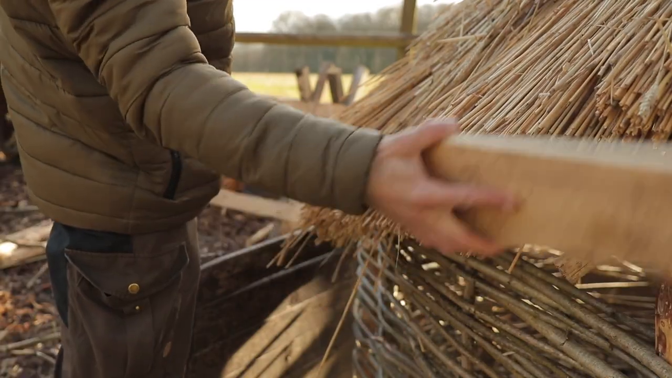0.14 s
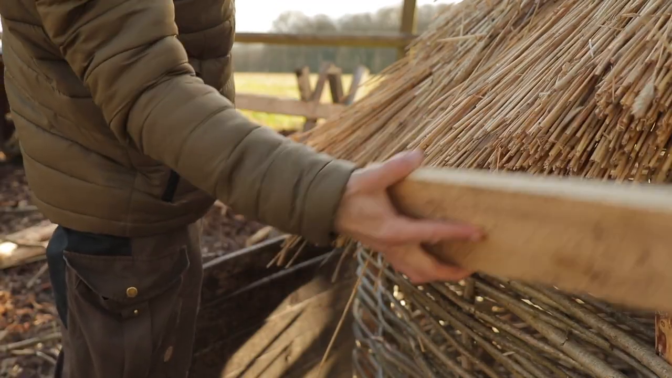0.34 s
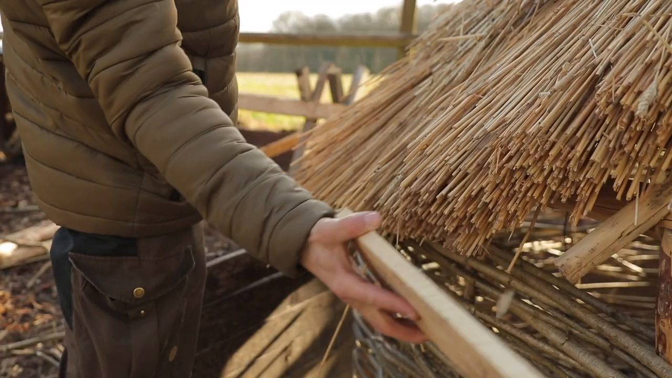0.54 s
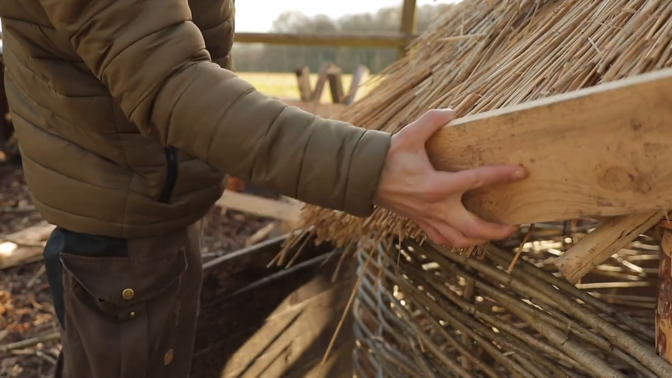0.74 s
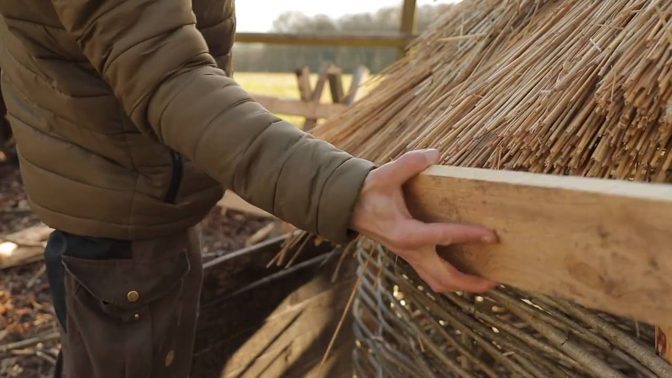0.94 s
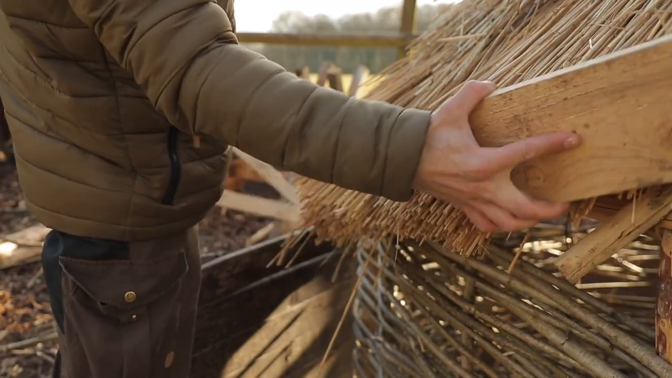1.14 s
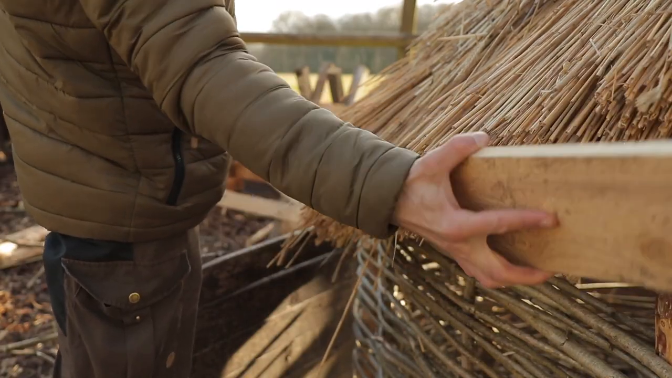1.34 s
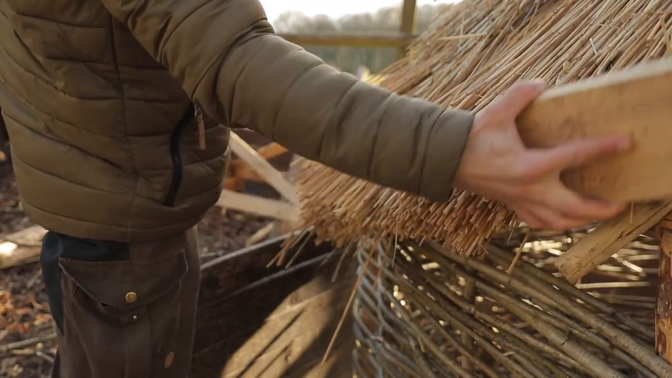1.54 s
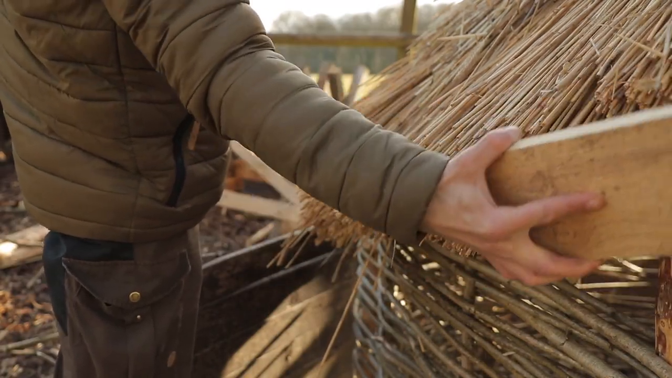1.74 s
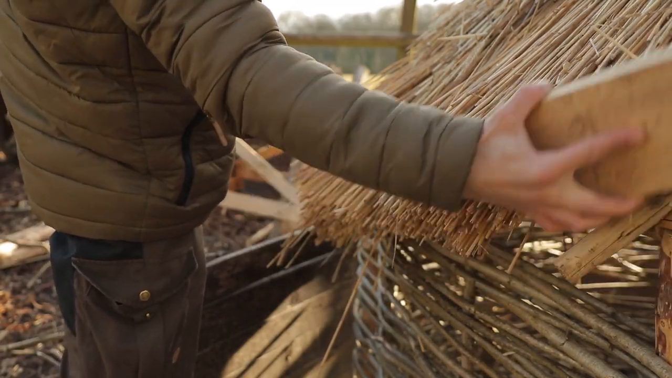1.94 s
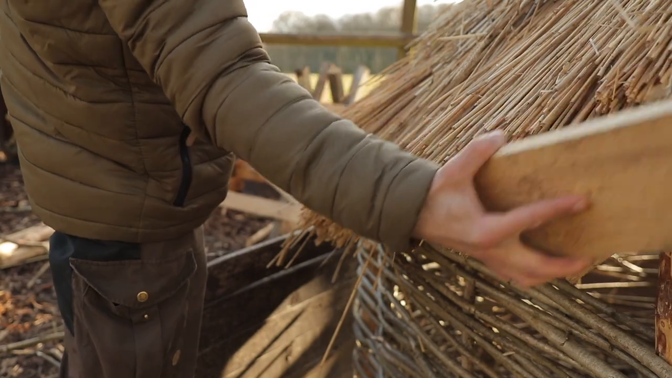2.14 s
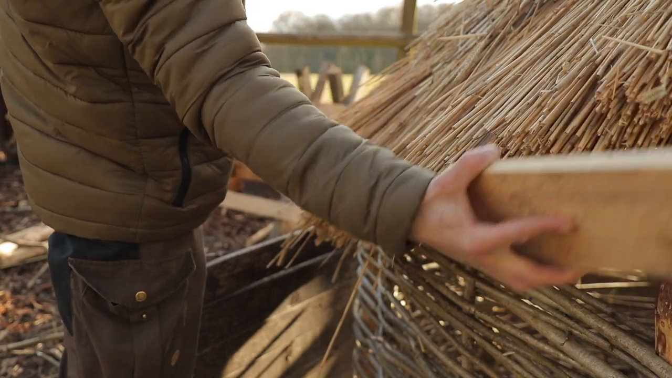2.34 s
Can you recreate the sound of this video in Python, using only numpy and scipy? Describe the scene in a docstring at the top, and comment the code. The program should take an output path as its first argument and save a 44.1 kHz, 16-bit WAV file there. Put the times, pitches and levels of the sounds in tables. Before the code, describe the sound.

Five steady wooden whacks on bundled dry reeds, each with a crunch, short thud and light rustle

```python
"""A low rumble of open air and the tick of a dry reed, then five steady blows of a flat wooden bat
that dresses the reed ends at the eaves of a thatched roof.
Proud reeds clack on the bat first; the whole bundle follows: a crunch of tiny impacts,
a low thud and a short wooden ring built from decaying modes.
Reeds rustle as they settle and tick around the blows, as coloured or resonant bursts of noise grains."""
import sys
import numpy as np
from scipy import signal
from scipy.fft import rfft, irfft
from scipy.io import wavfile
from scipy.ndimage import uniform_filter1d

SR = 44100
rng = np.random.default_rng(int(sys.argv[2]) if len(sys.argv) > 2 else 0)


def master_out(mix):
    """Clip the mix to full scale and print it as 16-bit PCM to the path in sys.argv[1]."""
    frames = np.transpose(np.atleast_2d(mix))
    ceiling = np.clip(frames, -1, 1)
    pcm = np.round(ceiling * 32767).astype(np.int16)
    wavfile.write(sys.argv[1], SR, pcm)


N = 105840
T = np.arange(N) / SR  # time axis [s]

# The five blows: (time of greatest force [s], crunch level [dB], crunch swell [s], thud level [dB],
# thud pitch [Hz], board ring level [dB], lowest bat mode as gripped [Hz], its level [dB],
# its t60 [s], rustle level [dB])
BLOW_TABLE = [(.2298, 1.5, 0.0021, 4, 307, -6.5, 631, 4, 0.032, 1),
              (.7613, 0, 0.0018, 1, 228, 0, 565.5, -8.5, 0.18, -1.5),
              (1.1956, -2.5, 0.0026, -2, 245, -8, 613, -13.5, 0.073, 5.5),
              (1.6143, -4, 0.0031, -0.5, 210.6, -8, 622, -11.5, 0.094, 2.5),
              (2.0122, 2, 0.0022, 2, 219, -11.5, 551.5, -0.5, 0.088, 5)]
# Colour of each blow, by where the bat lands: the band centres ([Hz])
TINT_BANDS_HZ = [600, 850, 1150, 1480, 1900, 2900, 5000]
# One row per blow: (level [dB] at each band centre)
BLOW_TINTS = [(4.5, -1.5, 2, 4, 1, 0, 0.41), (4, 9, -8.5, 1.5, -2.5, 2, 0.82),
              (1, 3, 2, 0.5, 5, -0.79, 0.43), (4.5, 2.5, 3, -9, 4.5, -0.76, 0.92),
              (5.5, -5, -2, 4.5, 5.5, -1, 0.19)]
CRUNCH_DB, THUD_DB, LOW_MODE_DB = -11.5, -13, -24


def blows():
    """Each blow sums the crunch of reed ends, the bundle's thud and the bat's ring."""
    out = np.zeros(N)
    for blow, tint_db in zip(BLOW_TABLE, BLOW_TINTS):
        at, crunch_db, swell, thud_db, thud_hz, ring_db, low_hz, low_db, low_t60, _ = blow
        tint = list(zip(TINT_BANDS_HZ, tint_db))
        out += amp(CRUNCH_DB + crunch_db) * crunch(at, swell, tint)
        out += amp(THUD_DB + thud_db) * thud(at, thud_hz)
        out += amp(LOW_MODE_DB + low_db) * mode(at, low_hz, low_t60)
        out += board_ring(at, ring_db, tint)
    return out


# Spectrum of the reed ends under the bat: (frequency [Hz], relative level [dB])
CRUNCH_SPECTRUM = [(40, -44), (140, -23), (250, -14), (390, -2.5), (490, -8.5), (620, -1), (1000, -1),
                   (1450, -2), (1850, -7.5), (2300, -12), (3000, -2.5), (3800, -12), (5000, -16.5),
                   (7000, -23.5), (10000, -27), (16000, -32.5)]
CONTACTS_PER_S = 9000
SWELL_SHAPE, RELEASE_S = 0.89, 0.0024  # exponent of the rise; time constant of the fall


def crunch(at, swell, tint):
    """Ever more reed ends meet the bat until the force peaks, then they let go."""
    rise = abs((T - at) / swell) ** SWELL_SHAPE
    fall = (T - at) / RELEASE_S
    force = np.exp(-np.where(T < at, rise, fall))
    impacts = contacts(np.tanh(2 * force), CONTACTS_PER_S)
    return colour(even_out(impacts), CRUNCH_SPECTRUM, tint)


THUD_S = .0019  # Gaussian width


def thud(at, hz):
    """The bundle gives way in one low push: a sine under a bell-shaped envelope."""
    t = T - at
    return np.exp(-.5 * (t / THUD_S) ** 2) * np.sin(2 * np.pi * hz * t)


# Modes of the bat above the lowest: (frequency [Hz], level [dB], t60 [s])
BOARD_MODES = [(1005, -9.5, .04), (1248, -4, 0.044), (1484, -2, 0.046), (1917, -7, 0.076),
               (2782, -7, 0.015), (3136, -10, 0.035), (3846, -17.5, .03)]
BOARD_DB = -19.5


def board_ring(at, ring_db, tint):
    """The bat's upper modes ring together, weighted by the tint of the blow."""
    ring = np.zeros(N)
    for hz, db, t60 in BOARD_MODES:
        ring += amp(BOARD_DB + ring_db + db + read(tint, hz)) * mode(at, hz, t60)
    return ring


RING_RISE_S = 0.001225
PRESSED_DB, PRESSED_S = 17, 0.0062  # the bat shakes harder while the reeds bear on it


def mode(at, hz, t60):
    """One mode of the bat: builds up under the reeds, then rings freely."""
    t = T - at
    build = .5 + .5 * np.tanh(t / RING_RISE_S + 2)
    pressed = amp(PRESSED_DB * np.exp(-(t / PRESSED_S) ** 2))
    decay = np.exp(-np.log(1000) * np.maximum(t, 0) / t60)
    tone = np.sin(2 * np.pi * (hz * t + rng.random()))
    return build * pressed * decay * tone


# First touches of proud reeds before a blow: (time [s], level [dB], ring pitch [Hz])
TOUCH_EVENTS = [(0.224, -13.5, 2793), (0.2247, -13.5, 1457), (0.7431, -27, 2780), (0.757, -23, 847),
                (1.1780, -17, 1475), (1.188, -15.5, 1280), (1.596, -29.5, 1430), (1.6054, -12, 1932),
                (2.0054, -22, 1520)]
# Spectrum of a touch's clack: (frequency [Hz], relative level [dB])
TOUCH_SPECTRUM = [(150, -24), (500, -9.5), (900, -1), (1450, -0.5), (2200, 0.5), (3100, -9.5),
                  (4500, -16.5), (8000, -28), (16000, -44.5)]
TOUCH_DB, TOUCH_T60_S = -4.5, 0.034
TOUCH_RING_DB, TOUCH_RING_T60_S = -6, .04


def touches():
    """Proud reeds clack on the bat a moment early: a burst of contacts and a brief sine ring each."""
    clacks = np.zeros(N)
    rings = np.zeros(N)
    for at, db, hz in TOUCH_EVENTS:
        clacks += amp(db) * contacts(dying(at, TOUCH_T60_S), CONTACTS_PER_S)
        rings += amp(db) * dying(at, TOUCH_RING_T60_S) * np.sin(2 * np.pi * hz * (T - at))
    return amp(TOUCH_DB) * colour(clacks, TOUCH_SPECTRUM) + amp(TOUCH_RING_DB) * rings


# Spectrum of reeds settling after a blow: (frequency [Hz], relative level [dB])
RUSTLE_SPECTRUM = [(200, -11), (700, -0.5), (1500, 1.5), (2400, -1), (3600, 0.5), (5500, -8.5),
                   (9000, -10.5), (16000, -16.5)]
RUSTLE_DB, RUSTLE_T60_S, RUSTLE_PER_S = -44.5, 0.27, 6000
STRAGGLERS_DB, STRAGGLERS_T60_S, STRAGGLERS_PER_S = -16, .85, 1100  # level relative to the rustle


def rustle():
    """Shaken reeds rub on each other and come to rest; a few stragglers crackle on."""
    grains = np.zeros(N)
    for at, *_, db in BLOW_TABLE:
        grains += amp(db) * contacts(dying(at, RUSTLE_T60_S), RUSTLE_PER_S)
        stragglers = contacts(dying(at, STRAGGLERS_T60_S), STRAGGLERS_PER_S)
        grains += amp(db + STRAGGLERS_DB) * stragglers
    return amp(RUSTLE_DB) * colour(grains, RUSTLE_SPECTRUM)


# Single reeds ticking: (time [s], level [dB], pitch [Hz], t60 [s], body level [dB], snap level [dB])
TICK_EVENTS = [(0.1386, -32.5, 3620, 0.0062, -1.5, -26), (.3915, -34.5, 4360, 0.0069, -14, -21.5),
               (0.4183, -65.5, 7600, .04, -19, -3.5), (.6330, -35.5, 3410, 0.053, -32.5, -35.5),
               (.9660, -34.5, 1790, 0.02, 8.5, -25), (1.11, -59, 5170, 0.034, -16, -17),
               (1.3514, -66.5, 6900, 0.071, -8.5, 1), (1.4415, -40, 2900, 0.023, -13, -8.5),
               (1.5270, -34.5, 3295, 0.0067, -22, -21), (2.0978, -41.5, 3250, .03, -14, -19)]
TICK_DB, TICK_Q, TICK_BODY_HZ = 4, 1.8, 600.6


def ticks():
    """A dry stem slips: a bright snap, its hollow resonance and a little body."""
    out = np.zeros(N)
    body_filter = signal.iirpeak(TICK_BODY_HZ, .5, SR)
    for at, db, hz, t60, body_db, snap_db in TICK_EVENTS:
        slip = amp(db) * contacts(dying(at, t60), CONTACTS_PER_S)
        hollow = signal.iirpeak(hz, TICK_Q, SR)
        stem = signal.lfilter(*hollow, signal.lfilter(*hollow, slip))  # two passes sharpen the pitch
        body = signal.lfilter(*body_filter, slip)
        out += amp(TICK_DB) * (stem + amp(body_db) * body + amp(snap_db) * slip)
    return out


# The yard's echo: (frequency [Hz], t60 of the near surfaces [s], t60 of the far ones [s])
YARD_DECAY = [(150, 0.11, 0.23), (600, 0.13, 0.74), (1500, 0.085, 0.69), (4053, 0.15, 0.09),
              (12000, 0.18, 0.28)]
NEAR_DB, FAR_DB, NEAR_DELAY_S = -18, -45, .004


def yard(x):
    """Quick reflections from roof and ground, and a faint far tail."""
    near = echo(NEAR_DELAY_S, [(hz, t60) for hz, t60, _ in YARD_DECAY])
    far = echo(2 * NEAR_DELAY_S, [(hz, t60) for hz, _, t60 in YARD_DECAY])
    near_sound = signal.fftconvolve(x, near)[:N]
    far_sound = signal.fftconvolve(x, far)[:N]
    return x + amp(NEAR_DB) * near_sound + amp(FAR_DB) * far_sound


def echo(delay, t60s):
    """Scattered reflections: noise of unit energy, each band dying at its own speed."""
    hz, t, bands = signal.stft(rng.standard_normal(SR // 2), SR, nperseg=128)
    decay = np.exp(-np.log(1000) * t / read(t60s, hz)[:, None])
    tail = signal.istft(bands * decay, SR, nperseg=128)[1]
    return np.r_[np.zeros(int(delay * SR)), tail / np.linalg.norm(tail)]


# Spectrum of the open air: (frequency [Hz], relative level per Hz [dB])
AIR_SPECTRUM = [(12, -41.5), (20, -12.5), (44, -4.5), (93, -1), (123, -8), (158, -10), (182, -18),
                (310, -18.5), (337, -24.5), (472, -22.5), (558, -25.5), (873, -26.5), (1330, -30),
                (1660, -34.5), (2140, -40.5), (3740, -43.5), (4670, -54.5), (16000, -66.5)]
# Rise and fall of the rumble: (time [s], relative level [dB])
RUMBLE_LEVEL = [(0, 7.5), (.1, 2), (.2, -2.5), (.5, -0.5), (.9, 0.5), (1.25, 1.5), (1.55, 3.5), (1.85, 1),
                (2.4, -5.5)]
AIR_DB, RUMBLE_TOP_HZ = -46, 259


def air():
    """Steady faint outdoor hiss over a rumble that slowly rises and falls, both from one noise."""
    hz = np.fft.rfftfreq(N, 1 / SR)
    noise = unit(irfft(rfft(rng.standard_normal(N)) * amp(read(AIR_SPECTRUM, hz)), N))
    rumble = irfft(rfft(noise) / (1 + (hz / RUMBLE_TOP_HZ) ** 4), N)
    hiss = noise - rumble
    drift = amp(np.interp(T, *np.transpose(RUMBLE_LEVEL)))
    return amp(AIR_DB) * (hiss + rumble * drift)


def contacts(envelope, per_s):
    """Random tiny impacts that carry the energy of the envelope."""
    hits = rng.random(N) < per_s / SR
    clicks = rng.standard_normal(N) * hits * envelope
    return unit(clicks) * np.sqrt(np.mean(envelope ** 2))


def dying(start, t60):
    """Sudden start, then a fall of 60 dB in t60."""
    return (T >= start) * np.exp(-np.log(1000) * np.maximum(T - start, 0) / t60)


def even_out(x, size=500):
    """Evens out the broad chance peaks and holes of a burst's spectrum, keeping its energy."""
    power = abs(uniform_filter1d(abs(rfft(x)) ** 2, size=size)) + 1e-9
    correction_db = -10 * np.log10(power + power.mean() / 4)  # the floor limits the boost in holes
    spectrum = np.c_[np.fft.rfftfreq(N, 1 / SR), correction_db]
    return unit(colour(x, spectrum)) * np.sqrt(np.mean(x ** 2))


def colour(x, *spectra, size=4096):
    """Causal filter with the summed dB spectra; the first is scaled to unit power."""
    hz = abs(np.fft.fftfreq(size, 1 / SR))
    gain = unit(amp(read(spectra[0], hz))) * amp(sum(read(s, hz) for s in spectra[1:]))
    # minimum phase: the filter answers without pre-ringing
    taps = np.fft.ifft(np.exp(np.conj(signal.hilbert(np.log(gain))))).real
    return signal.oaconvolve(x, taps[:size // 2])[:N]


def read(points, hz):
    """Reads a spectrum on a log-frequency axis."""
    f, value = np.transpose(points)
    return np.interp(np.log(hz + 1), np.log(f + 1), value)


def amp(db):
    """Decibels to gain."""
    return 10 ** (np.asarray(db) / 20)


def unit(x):
    """Scales to rms 1."""
    return x / np.sqrt(np.mean(x ** 2) + 1e-20)


def scene():
    """Bat and reeds in the yard, over the open air."""
    bat_and_reeds = blows() + touches() + rustle() + ticks()
    return (yard(bat_and_reeds) + air())[None]


EDGE_HZ = 16000  # upper band limit


def record(dry, ceiling=0.69):
    """The loudest peaks are rounded off by overload; then the band limit."""
    held = dry / (1 + (dry / ceiling) ** 6) ** (1 / 6)
    low_pass = signal.firwin(255, EDGE_HZ, window=("kaiser", 9), fs=SR)
    return signal.oaconvolve(held, low_pass[None], "same")


dry = scene()
out = record(dry)
master_out(out)
```